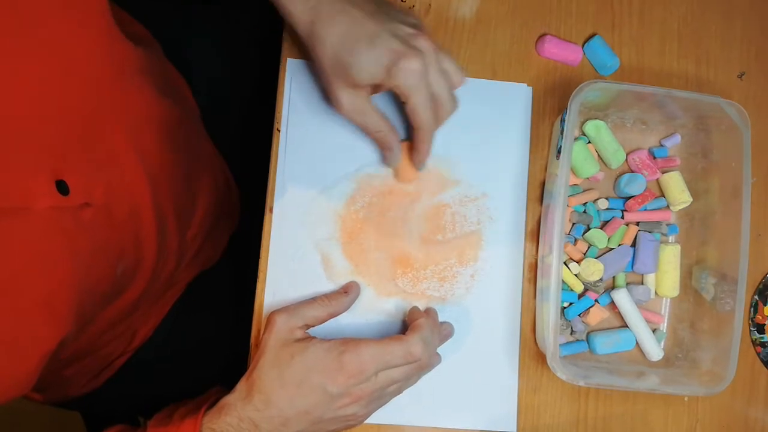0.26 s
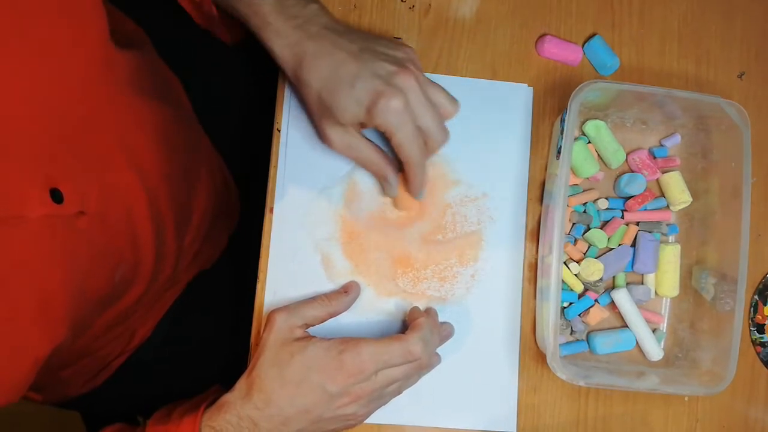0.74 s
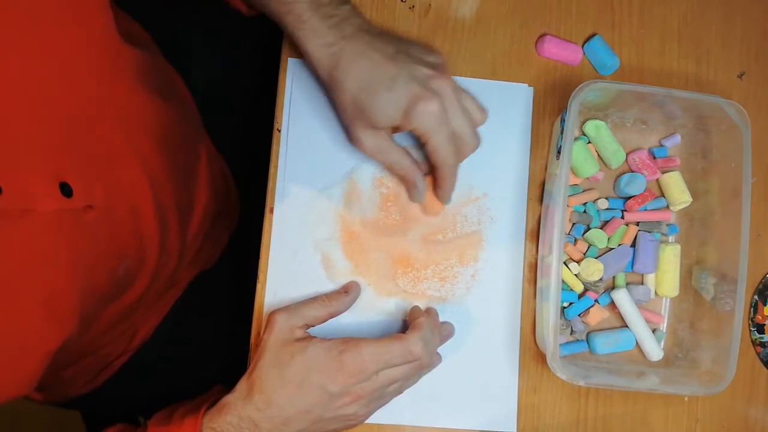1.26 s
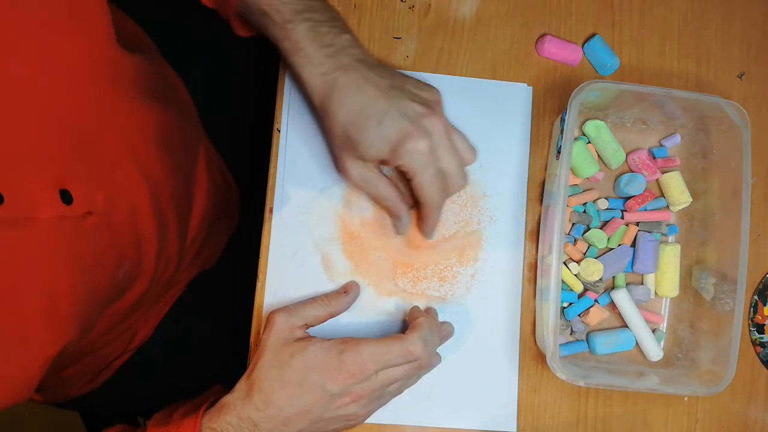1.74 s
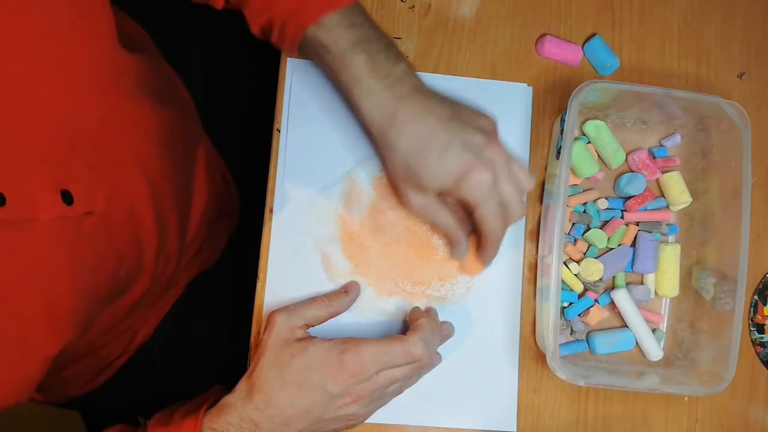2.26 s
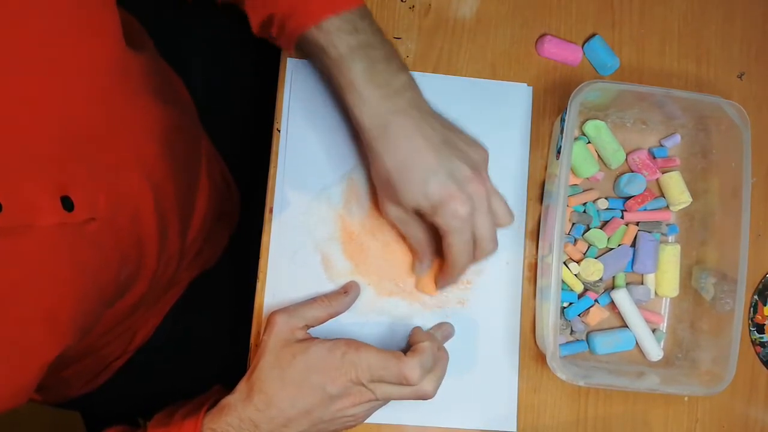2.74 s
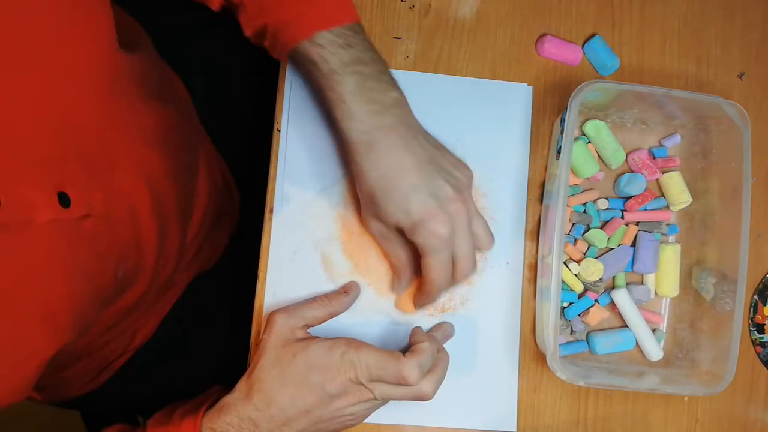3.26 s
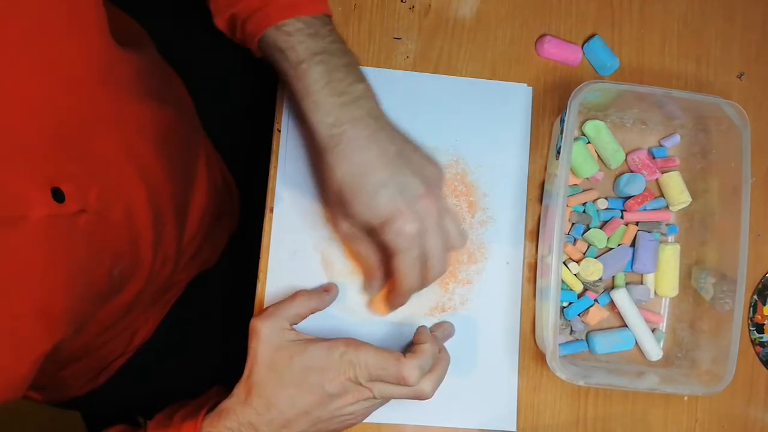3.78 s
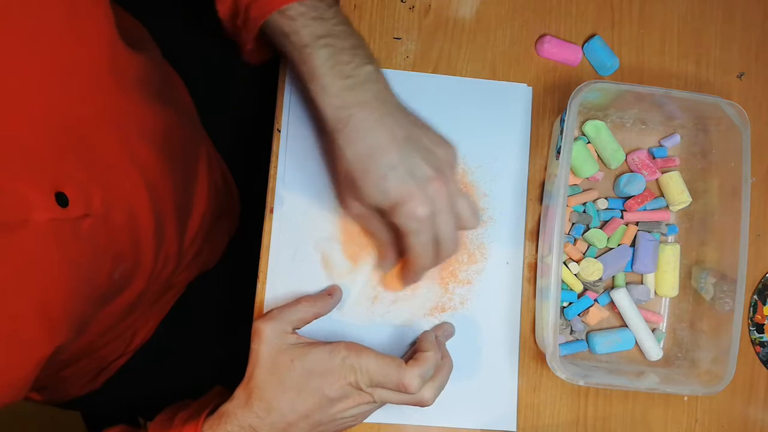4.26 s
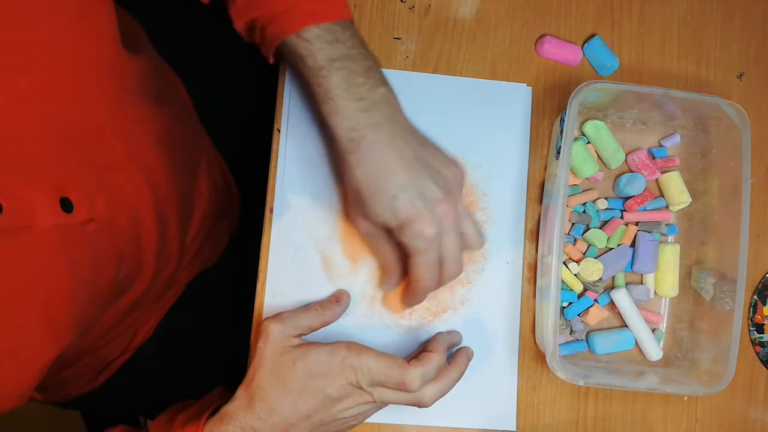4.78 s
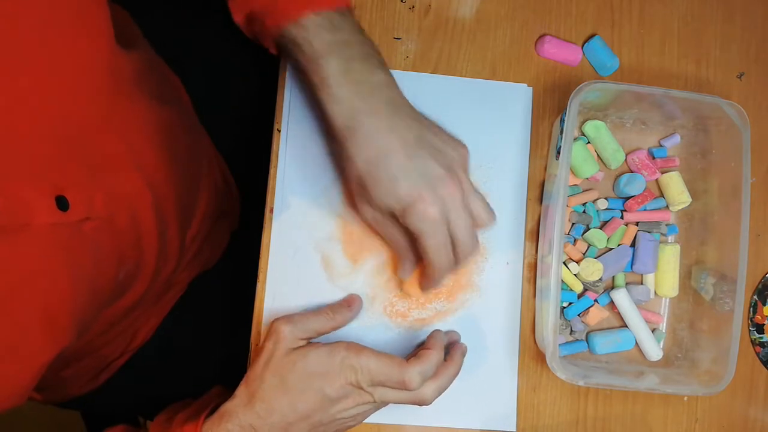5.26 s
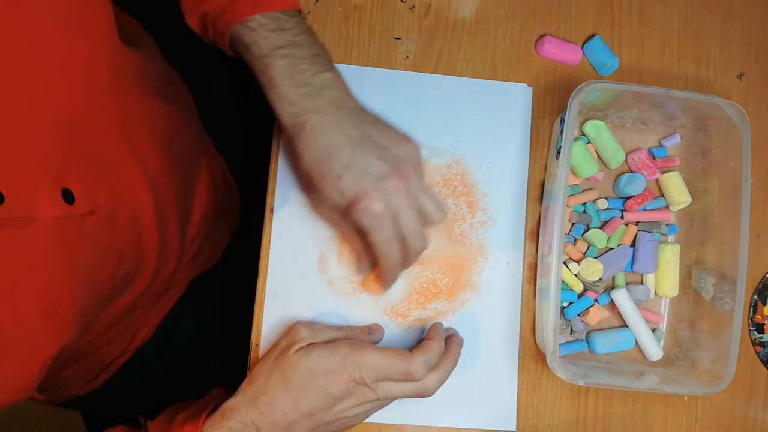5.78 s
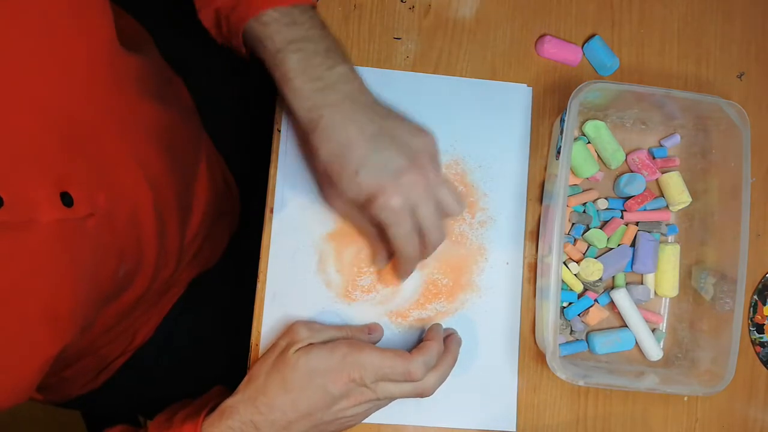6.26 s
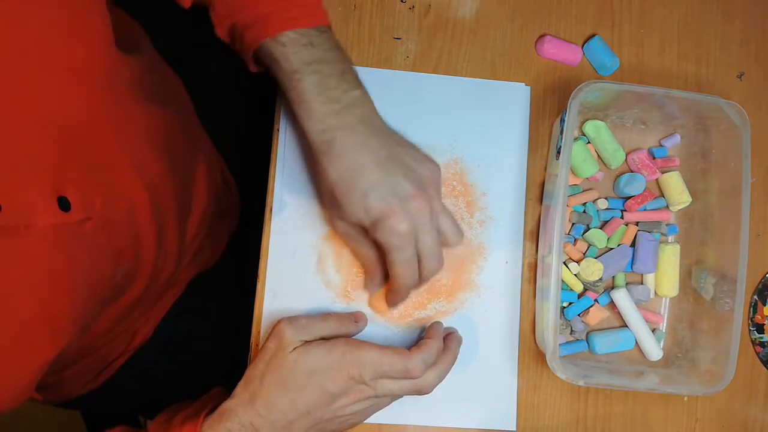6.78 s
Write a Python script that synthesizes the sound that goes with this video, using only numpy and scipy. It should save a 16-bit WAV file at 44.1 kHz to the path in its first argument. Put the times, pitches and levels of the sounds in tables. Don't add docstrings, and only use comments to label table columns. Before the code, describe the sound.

Close up, a chalk stick scrubs salt on paper in short, hard strokes, several each second. Dense bright crystal clicks ride over a dry paper rasp, and the wooden table rings hollowly and thuds under the pressing hand. Brief gaps let a few loose grains tick before scrubbing resumes. Small quiet room, two close microphones, the crystals brighter on the left.

```python
import sys
import numpy as np
from scipy import signal
from scipy.fft import rfft, irfft
from scipy.io import wavfile
from scipy.ndimage import uniform_filter1d

SR = 44100
rng = np.random.default_rng(int(sys.argv[2]) if len(sys.argv) > 2 else 0)


def file_out(sig):
    cols = np.atleast_2d(sig).T
    lim = np.clip(cols, -1, 1)
    pcm = np.round(lim * 32767).astype(np.int16)
    wavfile.write(sys.argv[1], SR, pcm)


def boost(x):
    u = np.asarray(x, float) / 20
    return 10 ** u


N = 309141
T = np.arange(N) / SR

# middle_s, length_s, grit_db, pressure_db (table
STROKES = [(0.039, 0.12, -35.5, -6), (0.053, 0.083, -34, -10), (0.174, 0.13, -57.5, -8),
           (0.304, 0.043, -30.5, -6.5), (0.422, 0.28, -33.5, -4.5), (0.6, 0.11, -34, -29.8),
           (0.632, 0.15, -36, -3), (0.712, 0.13, -32, -9), (0.814, 0.23, -32.5, -7.5),
           (0.94, 0.062, -34, -10.5), (1.258, 0.13, -29, -6), (1.367, 0.079, -29, -6),
           (1.488, 0.15, -29.5, -5.5), (1.587, 0.097, -48.5, 6.5), (1.626, 0.081, -31, -8),
           (1.72, 0.27, -35.5, -6), (1.763, 0.078, -31.5, -1.5), (1.895, 0.1, -31.5, -1.1),
           (2.015, 0.11, -32, -3), (2.128, 0.085, -36, -7.5), (2.273, 0.079, -32.5, -4.5),
           (2.349, 0.14, -32, -3.5), (2.467, 0.097, -40, -2), (2.742, 0.15, -33, -4),
           (2.859, 0.064, -40, -3), (2.949, 0.09, -37, -8), (3.024, 0.1, -36.5, -2.5),
           (3.098, 0.19, -36.5, -1.5), (3.267, 0.1, -34.5, -5), (3.366, 0.11, -35, -0.2),
           (3.678, 0.092, -30.5, -9.5), (3.799, 0.38, -51.5, -18), (3.918, 0.11, -30, -7),
                (3.972, 0.088, -51.5, 4.5), (4.203, 0.066, -31.5, -10), (4.245, 0.11, -33, -5.5),
                (4.443, 0.17, -54, -41), (4.537, 0.097, -33, -8.5), (4.61, 0.073, -39.5, -1.5),
                (4.656, 0.23, -38, -7.5), (4.773, 0.11, -34, -6.5), (4.883, 0.12, -32.5, -1),
                (5.005, 0.091, -33, 1.5), (5.113, 0.096, -33, 0.5), (5.204, 0.085, -49, 6.5),
                (5.22, 0.062, -43, -4.5), (5.287, 0.14, -43.5, -29), (5.557, 0.13, -33.5, -6),
                (5.7, 0.13, -34.5, -9.5), (5.813, 0.13, -33, -7), (5.932, 0.087, -32, -10),
                (6.053, 0.15, -31.5, -6.5), (6.169, 0.091, -32.5, -4), (6.272, 0.088, -33, -7),
                (6.43, 0.15, -48.5, -32), (6.54, 0.64, -42.5, -6), (6.628, 0.17, -35.5, -6.5),
                (6.767, 0.13, -34, -7.5), (6.884, 0.1, -33.5, -1.5), (7.04, 0.13, -35, 0.5)]
# start_s, crystal_bite_db, thump_peak_db
LANDINGS = [(0.284, -44, -44), (0.784, -43.5, -64), (1.167, -29, -49), (1.851, -30, -57), (2.255, -46, -44),
            (2.628, -24.5, -35), (3.598, -31, -30.5), (3.835, -35.5, -41), (3.887, -46, -60),
            (4.124, -30.5, -45), (4.454, -26.5, -31), (4.963, -41, -62), (5.205, -42, -49),
            (5.485, -38.5, -51), (5.858, -33, -60), (6.138, -30.5, -71), (6.491, -28.5, -37)]
# time_s, thud_db (over the pressure)
ARM_WEIGHT = [(0, -3), (.4, -9), (.57, -1.5), (.75, -5.5), (.9, 1.5), (1.3, -7), (1.68, -3.5), (2.3, -7),
              (2.64, -4.5), (3.3, -4), (3.62, -2), (3.95, -5.5), (4.47, -1), (4.62, -6), (4.78, -6),
              (5.6, -5.5), (5.95, -1), (6.6, -8)]
# middle_s, length_s, extra_thud_db, extra_low_ring_db
SHOVES = [(0.085, 0.095, 3.5, 4), (0.568, 0.06, 5, 10), (1.683, 0.16, 7, 6.5), (1.955, 0.15, 7, 0),
          (2.143, 0.16, 1, 4), (2.942, 0.14, 8.5, 12), (3.23, 0.11, 6, 7.5), (3.837, 0.049, 2, 13),
          (4.148, 0.14, 1, -12), (4.772, 0.15, 12, 6), (5.253, .1, 2, 2), (5.957, 0.16, 8.5, 3.5),
          (6.209, 0.092, 8, 3.5), (6.368, 0.18, 10, 15.5), (6.75, 0.25, 9, 7), (6.972, 0.12, 10, -1)]
# time_s, bare_paper_rasp_db, ring_tilt_db_per_octave, middle_modes_db
CHALK_PLACE = [(0, 1.5, 3, 8), (.35, 2.5, -1, -16), (.9, -0.5, 1, -6), (1.45, -2, -6, -0.5),
               (1.9, -6.5, -4, -2), (2.2, -3.5, -9, -11), (2.5, -2, -1, -2), (2.9, 0, 3.5, 4),
               (3.35, -4.5, 1.5, -1), (3.7, 3.5, 4, 3), (4.2, 0.5, 5.5, 0.5), (4.6, 3, 5.5, 6),
               (5.05, -5.5, -3, -1), (5.55, 2.5, 5, -5), (5.9, 1.5, 5, 2), (6.2, -2.5, 1, -1.5),
               (6.6, 4, 5.5, 7.5), (7, -2, 3, -1)]
# time_s, bottom_modes_db, lower_modes_db, upper_ridge_db
HAND_DAMPING = [(0, -6, 4, -6), (.35, -6, 0, 8.5), (.8, 3.5, 4, 5.5), (1.2, -5, -1.5, 3.5),
                (1.55, -4, 0, 2), (2.0, -4.5, -1, 4), (2.3, -4.5, -3.5, 5.5), (2.8, -6, 2.5, -0.5),
                (3.35, -3, -3, -4), (3.7, 1.5, 0, 4.5), (4.2, 3.5, -5, 1), (4.5, 1.5, 1.5, 0),
                (5.0, -7.5, -5.5, -2), (5.3, -8, -1, 3), (5.7, 7, -2.5, 3), (6.2, -1, -2.5, 2.5),
                (6.55, -4, 7.5, 2), (7, -5, -6, 0)]
# time_s, port_crystals_db (extra from the crystals that ring the port)
SALT_DEPTH = [(0, 7), (.12, -4.5), (.3, -0.5), (.9, -1.5), (1.5, -1.5), (2, -0.5), (2.3, 3.5), (2.6, 1),
              (3.1, 2), (3.7, -1), (3.95, -0.5), (4.6, 0.5), (5.1, 1.5), (5.6, 0), (6.2, -2.5), (7, 2)]

PORT_HZ = 9000
# pitch_hz, pressure_share (0-1)
CRYSTAL_SORTS = [(4360, 0.43), (6460, 0.017), (PORT_HZ, 0), (14400, 0)]
# freq_hz, level_db (per Hz)
GRIT_LEFT = [(2500, -47), (3800, -17), (4500, -9), (5400, -9.5), (7300, -7.5), (8200, -4.5), (8900, -1),
             (9800, -3), (10800, -8), (12500, -15), (14500, -25), (17000, -16)]
# freq_hz, level_db (per Hz)
GRIT_RIGHT = [(2500, -51), (3800, -11.5), (4500, -14), (5200, -15.5), (7500, -17.5), (8800, -19.5),
              (9600, -20.5), (11000, -26), (13000, -30), (17000, -26)]
# freq_hz, level_db (per Hz)
PAPER_RASP = [(500, -29.5), (1200, 5.5), (1720, 0), (1860, 1.5), (2100, 2), (3400, 0.5), (4200, -1),
              (6000, -13)]
# start_s, peak_db, pitch_hz
CRACKS = [(0.0286, -11, 8850), (0.3096, -22, 8800), (0.718, -15.5, 9340), (0.819, -18, 8900),
          (1.2135, -17, 9090), (1.3767, -12, 8900), (1.7015, -23, 8850), (1.8567, -17, 9400),
          (1.98, -22, 8850), (2.1241, -24, 9300), (2.2603, -19, 9450), (2.2674, -16, 9200),
          (2.2882, -12, 9200), (2.3676, -9, 9300), (2.6294, -19, 8850), (2.8629, -25, 9150),
          (3.0101, -28, 9000), (3.6645, -18, 9560), (3.839, -20, 9900), (3.898, -22, 8770),
          (4.4578, -13.5, 9530), (4.4987, -32, 8500), (4.5175, -13, 8640), (4.8464, -30, 9410),
          (4.9886, -20, 8750), (5.079, -28, 9700), (5.2091, -30, 8950), (5.5542, -18.5, 8100),
          (5.7517, -23, 8500), (6.2527, -20, 8540), (6.6722, -21, 9500)]
# start_s, peak_db, pitch_hz
SPLITS = [(0.0404, -13, 9360), (0.064, -18, 8900), (0.3007, -23, 8900), (0.3194, -26, 8300),
          (0.4479, -19, 8640), (0.5317, -23, 9000), (0.7836, -20, 8630), (1.2486, -18, 8750),
          (1.2634, -17, 8700), (1.4471, -16, 8900), (1.7315, -30, 9000), (1.9121, -21, 8840),
          (2.0966, -25, 9040), (2.2824, -12, 9350), (2.3366, -13, 9210), (2.634, -11, 9060),
          (2.6436, -16, 8800), (2.6514, -32, 8780), (2.66, -14, 8800), (2.6694, -24, 8900),
          (2.7057, -22, 8720), (2.9941, -25, 8600), (3.1318, -23, 9550), (3.2211, -21, 9000),
          (3.6446, -30, 8500), (3.6764, -15, 9700), (3.7174, -24, 9000), (3.9214, -14.5, 8850),
          (4.1714, -33, 8900), (4.1879, -23, 9400), (4.9671, -23, 8900), (5.4894, -29, 8600),
          (5.7897, -23, 8550), (5.8584, -20, 9000), (6.1409, -27, 8600), (6.4931, -37, 8900),
          (6.5365, -22, 9000), (6.6149, -23, 8500)]
# start_s, peak_db, pitch_hz
CRUSHES = [(0.5651, -30, 6770), (1.212, -29, 5260), (1.734, -28, 6030), (1.9904, -29, 6840),
           (2.0961, -29, 6310), (2.125, -24, 7090), (2.4606, -26.5, 6130), (3.2321, -33, 5760),
           (3.252, -26, 6900), (3.898, -31, 6980), (4.5171, -33, 6810), (4.9661, -40, 6910),
           (5.0789, -33, 5020), (5.209, -33, 3290), (6.2612, -23, 7030)]
# start_s, peak_db, pitch_hz
SKIPS = [(3.4834, -42, 8680), (4.3765, -42, 8630), (4.3894, -38, 8800), (4.4004, -43, 9100),
         (5.2224, -32, 8790), (5.2484, -29, 9590), (5.3084, -33, 9500), (5.3434, -38, 9330),
         (5.3624, -41, 8840), (6.4144, -42, 8810), (6.4364, -40, 8760), (6.4544, -42, 9160),
         (6.4624, -38, 9240)]
# freq_hz, level_db
SKIP_TONE = [(2500, -30), (5000, -8), (9000, -2), (12000, -5), (15000, -10)]
# start_s, peak_db, pitch_hz
TRICKLE = [
    (3.7614, -41, 8900),
    (3.7804, -34, 9400),
    (3.7993, -35, 9100),
    (3.818, -36, 9300),
    (6.3649, -35, 8300),
    (6.3864, -30, 8170),
    (6.3974, -30, 8700),
    (6.4064, -50, 9450),
    (6.4264, -54, 9140),
    (6.4453, -30, 10200),
]
# freq_hz, level_db
TICK_TONE = [(4500, -26), (5900, -19), (6400, 5), (7600, -16), (8900, -8), (10500, -3), (15000, -28)]
# start_s, length_s, level_db, from_hz, to_hz
SQUEAKS = [
    (.158, .062, -51, 5760, 5790),
    (.15, .08, -55, 4450, 4150),
    (.17, .1, -58, 3950, 3850),
    (.19, .05, -63, 11000, 9300),
    (.245, .04, -62, 10900, 9200),
    (1.04, .07, -64, 4600, 4400),
]

# pitch_hz, width_hz, left_db, right_db, right_phase_turns (against left)
RING_MODES = [(218, 54, -20, -33, 0.15), (250.8, 17, -3, -1, 0.03), (311.3, 42.6, -2.5, -2, 0.088),
              (374.3, 22, -11, -5.5, -0.11), (450, 62, -35, -5, -0.24), (520.7, 25, 1.5, 1, 0.47),
              (574, 44, 0.5, -0.5, 0.46), (617.5, 19.4, -4.5, -1, 0.11), (688, 26, -0.5, 4, 0.38),
              (768, 27, 4.5, 6, -0.37), (828, 32, 3, 4.5, 0.37), (886.6, 30, -3, -1, 0.019),
              (945, 42, -6, 3.5, -0.27), (1045, 40, 3, 0, 0.27), (1147.5, 40, 1, -5.5, -0.41),
              (1286, 23, -8.5, -0.5, -0.16), (1383, 47, -5, -2, 0.016), (1538, 30, -5.5, -2, 0.21),
              (1646, 55, -7, -7, 0.03), (1800, 81, -14, -13.5, 0.11), (2014, 56, -17, -8.5, 0.22),
              (2370, 43, -32, -10, 0.5)]
# pitch_hz, width_hz, left_db, right_db, right_phase_turns
THUD_MODES = [(65, 24, -9.5, -13, 0.01), (75, 13, -8.5, -8.5, 0.0092), (117.1, 7.8, -2.5, -2, 0.01),
              (138, 6.4, -5, -5, 0.01)]

# freq_hz, level_db
ROOM_COLOUR = [(120, -32.5), (380, -2), (1000, -4.5), (1900, -1.5), (2700, 0.5), (4200, -6), (6000, -4.5),
               (9000, -5), (14000, -7)]
# freq_hz, level_db (per Hz)
HUSH_COLOUR = [(18, -3), (30, 12.5), (165, 2.5), (569, -14), (2010, -18), (2750, -17.5), (3770, -13),
               (6050, -20), (9220, -18.5), (16000, -32)]

RIGHT_LAG = -26
HAND_STEP = 8
TOUCH_S, TABLE_TOUCH_S = 0.0041, 0.016
TABLE_LAG_S = 0.0089
BITE_S, BITE_TABLE_S, BITE_TABLE_DB = 0.0087, 0.028, -10.5
RASP_DB, RASP_SHARE = -7, 0.74
ROCK_S, ROCK_SHARE = 0.0071, 0.61
BOTTOM_HZ, BOTTOM_OCT, LOWER_HZ, LOWER_OCT = 413, 0.38, 775, 0.16
MIDDLE_HZ, MIDDLE_OCT, RIDGE_HZ, RIDGE_OCT = 948, 0.085, 1607, 0.082
TILT_HZ, LOW_HZ = 915, 470

SHOVE_DB = sum(np.outer(db, np.exp(-8 * ((T - s) / length) ** 2)) for s, length, *db in SHOVES)
PLACE_DB = [np.interp(T, np.transpose(CHALK_PLACE)[0], c) for c in np.transpose(CHALK_PLACE)[2:]]
DAMPING_DB = [np.interp(T, np.transpose(HAND_DAMPING)[0], c) for c in np.transpose(HAND_DAMPING)[1:]]


def scrubbing():
    grit_db, rasp_db, ring_db, thud_db = hand_levels()
    clumps_db = 0.17 * walk(200) + 0.47 * walk(40)
    coarse = crunch(2500, 1.06, clumps_db + 1.16 * walk(90))
    hiss = in_band(grit(clumps_db, np.clip(rasp_db + 3, -20, 6)), grit_db)
    rasp = two_ears(coarse, PAPER_RASP, PAPER_RASP, shared=0.28)
    rasp = in_band(rasp, grit_db + rasp_db + 1.5)
    ring = plate(lambda: coarse * rng.standard_normal(N), RING_MODES, wander_db=1.74,
                 favour=nodes, drift=0.008)
    ring = in_band(ring, grit_db + ring_db + 0.83)
    thud = in_band(plate(lambda: rng.standard_normal(N), THUD_MODES, wander_db=1.4), thud_db)
    return hiss + rasp + ring + thud


def hand_levels():
    lands = np.array(LANDINGS)[:, 0]
    t = T[::HAND_STEP]
    speed, press = np.full((2, len(t)), 1e-9)

    for middle, length, db, table_db in STROKES:
        last_landing = np.max(lands[lands < middle], initial=-1)
        since = np.maximum(t - last_landing, 0)

        def bell(lag, touch):
            return np.minimum(since / touch, 1) * np.exp(-8 * ((t - middle - lag) / length) ** 2)

        speed += boost(db) ** 2 * bell(0, TOUCH_S)
        press += boost(db + table_db) ** 2 * bell(TABLE_LAG_S, TABLE_TOUCH_S)

    for s, db, _ in LANDINGS:
        since = np.maximum(t - s, 0)
        grip, load = np.minimum(since / TOUCH_S, 1), np.minimum(since / TABLE_TOUCH_S, 1)
        speed += grip * boost(db) ** 2 * np.exp(-since / BITE_S)
        press += load * boost(db + BITE_TABLE_DB) ** 2 * np.exp(-since / BITE_TABLE_S)

    speed, press = np.interp(T, t, speed), np.interp(T, t, press)
    grit_db = 10 * np.log10(speed)
    ring_db = 10 * np.log10(press) - grit_db
    rasp_db = RASP_DB + RASP_SHARE * ring_db + np.interp(T, *np.transpose(CHALK_PLACE)[:2])
    rock_db = 10 * np.log10(np.abs(uniform_filter1d(press, int(ROCK_S * SR))))
    thud_db = -41 + ROCK_SHARE * (rock_db + 38.0)
    thud_db = thud_db + np.interp(T, *np.transpose(ARM_WEIGHT)) + SHOVE_DB[0]
    return grit_db, rasp_db, ring_db, thud_db


def grit(clumps_db, pressure_db, overlap_db=-20):
    out = 0
    for pitch_hz, share in CRYSTAL_SORTS:
        own_db = clumps_db + 1.5 * walk(150) + 0.76 * walk(12) + share * pressure_db
        if pitch_hz == PORT_HZ:
            own_db = own_db + np.interp(T, *np.transpose(SALT_DEPTH))
        force = crunch(1800, 1.9, own_db)

        def around_pitch(ear):
            return [(f, db + overlap_db * min(abs(np.log2(f / pitch_hz)), 2)) for f, db in ear]

        out = out + two_ears(force, around_pitch(GRIT_LEFT), around_pitch(GRIT_RIGHT), shared=0.063)
    return out


def crunch(per_s, spread_db, clumps_db, crumble_s=0.00049):
    breaks = rng.random(N) < per_s / SR
    size_db = spread_db * np.minimum(rng.exponential(size=N), 3.5)
    power = breaks * boost(size_db + clumps_db) ** 2
    return np.sqrt(signal.lfilter([1], [1, -np.exp(-1 / (crumble_s * SR))], power))


def two_ears(force, left, right, shared):
    both, own = force * rng.standard_normal((2, N))
    shared = np.clip(shared, 0, 1)
    far = np.roll(shared * both + np.sqrt(1 - shared ** 2) * own, RIGHT_LAG)
    return np.array([colour(both, left), colour(far, right)])


def plate(push, modes, wander_db, favour=lambda hz: 0, drift=0.):
    out = np.zeros((2, N))
    for hz, width, left_db, right_db, turns in modes:
        pole = np.exp((2j * np.pi * hz - np.pi * width) / SR)
        share = boost(wander_db * walk(16) + favour(hz))
        z = signal.lfilter([width], [1, -pole], push() * share)
        z = z * np.exp(2j * np.pi * np.cumsum(drift * hz * walk(5)) / SR)
        right = z * np.exp(2j * np.pi * turns)
        out += [boost(left_db) * z.real, boost(right_db) * right.real]
    return out


def nodes(hz):
    tilt_db, middle_db = PLACE_DB
    bottom_db, lower_db, ridge_db = DAMPING_DB

    def group(centre_hz, octaves):
        return np.exp(-(np.log2(hz / centre_hz) / octaves) ** 2)

    db = group(MIDDLE_HZ, MIDDLE_OCT) * middle_db + group(LOWER_HZ, LOWER_OCT) * lower_db
    db = db + group(RIDGE_HZ, RIDGE_OCT) * ridge_db + group(BOTTOM_HZ, BOTTOM_OCT) * bottom_db
    db = db + tilt_db * np.log2(max(hz, TILT_HZ) / TILT_HZ)
    return db + (SHOVE_DB[1] if hz < LOW_HZ else 0)


def cracks(events, tone, ring_s, snap_db, gain_db, right_db=-20):
    bursts, snaps, t = np.zeros(N + 512), np.zeros(N), np.arange(512) / SR
    swell = np.e * t / ring_s * np.exp(-t / ring_s)
    for s, db, hz in events:
        i = int(s * SR)
        bursts[i:i + 512] += boost(db) * swell * np.sin(2 * np.pi * hz * t)
        snaps[i] = boost(db + snap_db)
    left = boost(gain_db) * (bursts[:N] + colour(snaps, tone))
    return np.array([left, boost(right_db) * np.roll(left, RIGHT_LAG)])


def single_crystals():
    out = cracks(CRACKS, GRIT_LEFT, ring_s=0.0005, snap_db=-17, gain_db=3)
    out += cracks(SPLITS, GRIT_LEFT, ring_s=0.00088, snap_db=-12, gain_db=0.0)
    out += cracks(TRICKLE, TICK_TONE, ring_s=0.0011, snap_db=26, gain_db=-4.5)
    out += cracks(CRUSHES, PAPER_RASP, ring_s=0.00059, snap_db=-6, gain_db=1.5, right_db=-16)
    out += cracks(SKIPS, SKIP_TONE, ring_s=0.0002, snap_db=12, gain_db=4.0, right_db=-12)
    return out


def landings(push_s=0.01):
    hits = np.zeros(N)
    for s, _, db in LANDINGS:
        hits[int(s * SR)] = boost(db)
    push = np.convolve(hits, np.hanning(int(push_s * SR)))[:N]
    thump = plate(lambda: push, THUD_MODES, wander_db=0.5)
    return thump * np.max(hits) / np.max(np.abs(thump)) * boost(-0.5)


def squeaks(waver=0.002, right_db=-11):
    out, shake = np.zeros(N), walk(150)
    for s, length, db, from_hz, to_hz in SQUEAKS:
        n, i = int(length * SR), int(s * SR)
        rough = 10 if from_hz < 5000 else 1
        hz = np.linspace(from_hz, to_hz, n) * (1 + rough * waver * shake[i:i + n])
        flutter = boost(db + rough / 2 * shake[::-1][i:i + n])
        out[i:i + n] += flutter * np.sqrt(np.hanning(n)) * np.sin(2 * np.pi * np.cumsum(hz) / SR)
    return np.array([out, boost(right_db) * np.roll(out, RIGHT_LAG)])


def room(x, t60_s=0.22, room_db=-8):
    t = T[:SR // 2]
    tails = rng.standard_normal((2, len(t))) * boost(-60 * t / t60_s) * (t > .004)
    out = []
    for dry_ear, tail in zip(x, tails):
        tail = colour(tail, ROOM_COLOUR)
        tail = tail * boost(room_db) / np.linalg.norm(tail)
        out.append(signal.fftconvolve(dry_ear, tail)[:N])
    return np.array(out)


def hush():
    mid, side = (colour(rng.standard_normal(N), HUSH_COLOUR) for _ in range(2))
    side = colour(side, [(150, -11.0), (500, 2.0)])
    return level(mid + side * np.array([[1], [-1]]), -59)


def level(x, db=0):
    return x * boost(db) / np.sqrt(np.mean(x ** 2))


def in_band(x, db):
    return x / np.sqrt(np.mean(x.mean(axis=0) ** 2)) * boost(db)


def colour(x, points, size=8192):
    hz, db = np.transpose(points)
    bins_hz = np.arange(size // 2 + 1) * SR / size
    cep = irfft(np.interp(np.log(bins_hz + 1), np.log(hz), np.log(boost(db))))
    cep[1:size // 2] *= 2
    response = irfft(np.exp(rfft(cep[:size // 2 + 1], size)))[:size // 2]
    return signal.fftconvolve(x, response)[:x.shape[-1]]


def walk(rate):
    k = int(SR / rate)
    held = np.repeat(rng.standard_normal(N // k + 1), k)
    return np.sqrt(2) * uniform_filter1d(uniform_filter1d(held, k), k)[:N]


def scene():
    near = scrubbing() + single_crystals() + landings() + squeaks()
    return near + room(near) + hush()


def band_limit(x):
    return signal.sosfilt(signal.butter(12, 16500, fs=SR, output="sos"), x)


def record(dry):
    no_bass = signal.butter(2, 46, "high", fs=SR, output="sos")
    no_top = signal.ellip(12, .3, 45, 15720, fs=SR, output="sos")
    mix = signal.sosfilt(no_top, signal.sosfilt(no_bass, dry))
    return band_limit(mix)


dry = scene()
out = record(dry)
file_out(out)
```